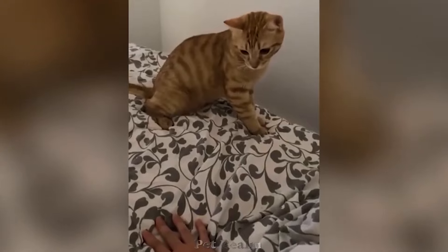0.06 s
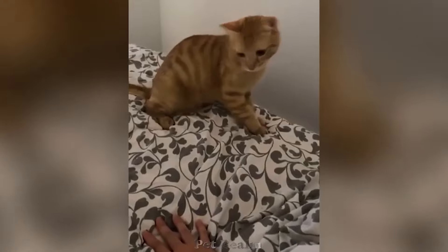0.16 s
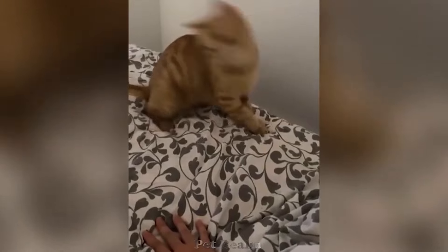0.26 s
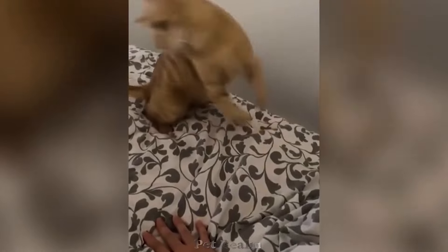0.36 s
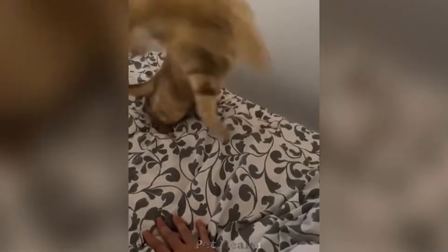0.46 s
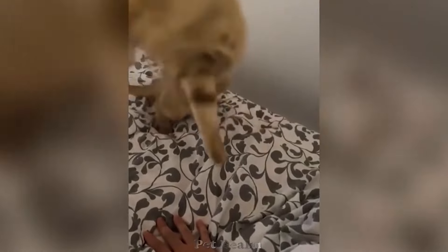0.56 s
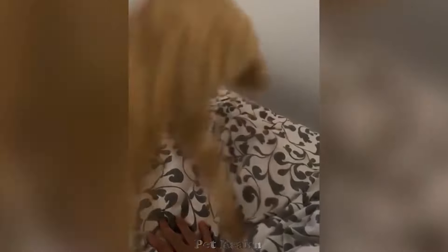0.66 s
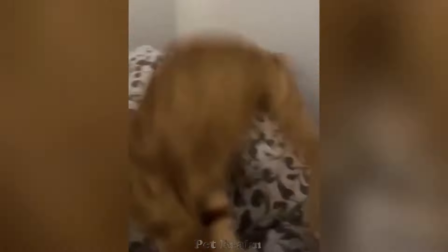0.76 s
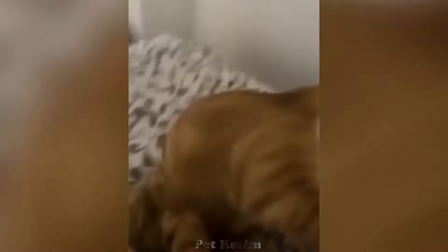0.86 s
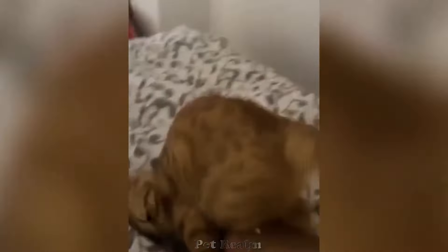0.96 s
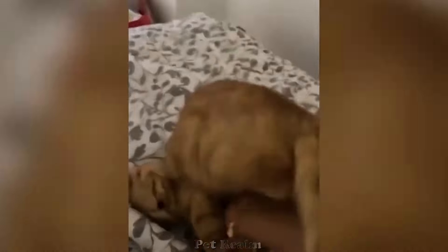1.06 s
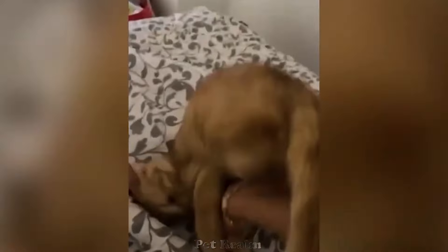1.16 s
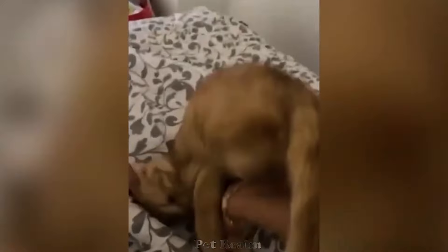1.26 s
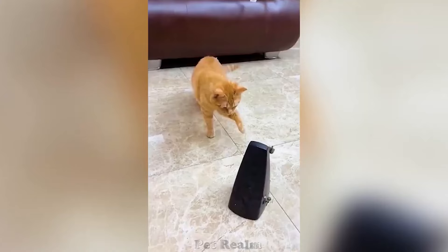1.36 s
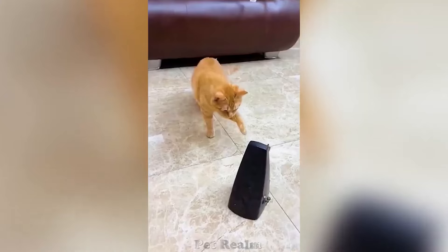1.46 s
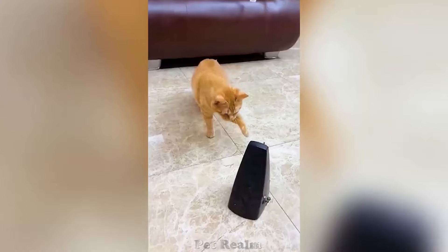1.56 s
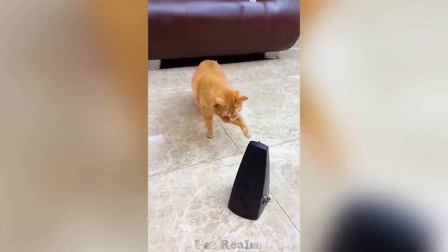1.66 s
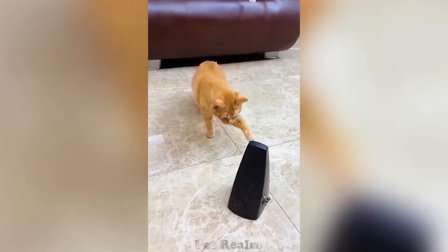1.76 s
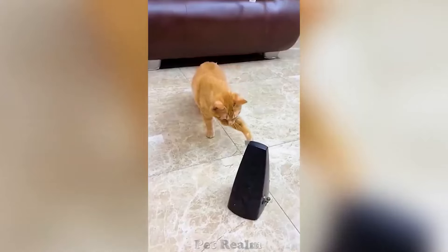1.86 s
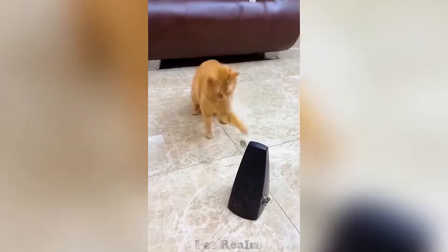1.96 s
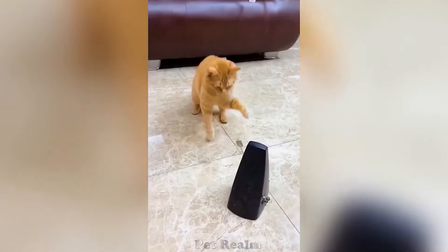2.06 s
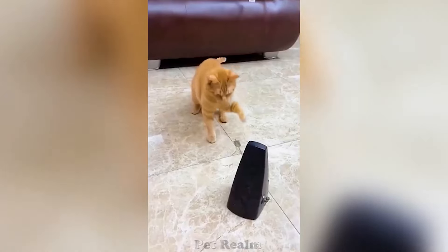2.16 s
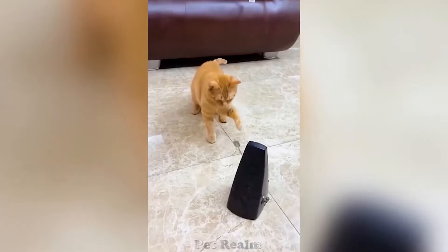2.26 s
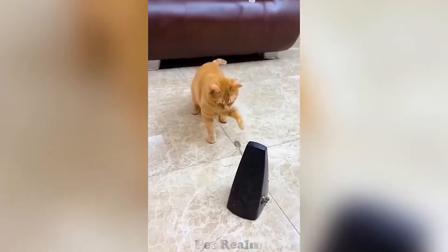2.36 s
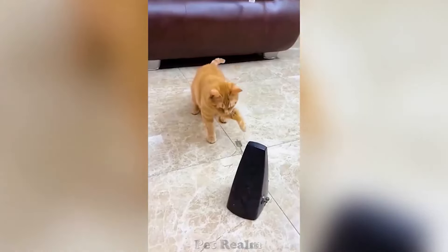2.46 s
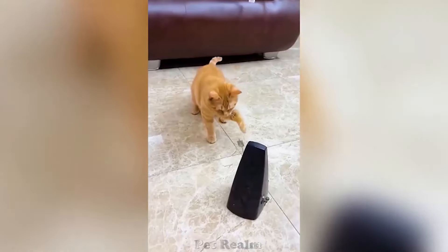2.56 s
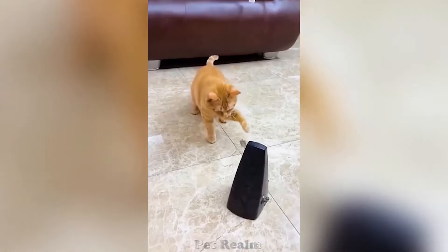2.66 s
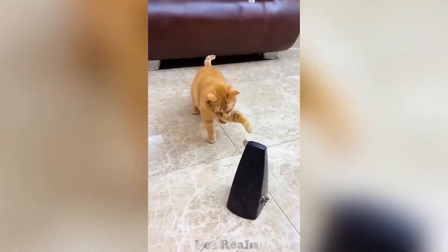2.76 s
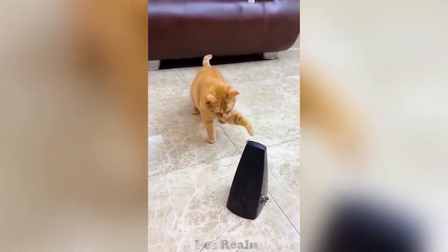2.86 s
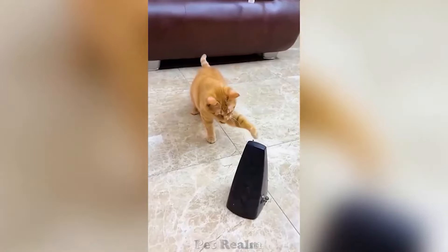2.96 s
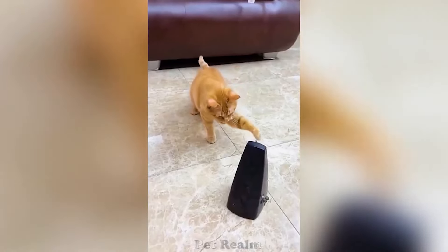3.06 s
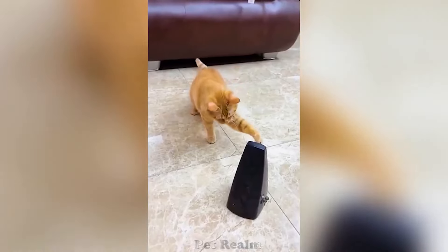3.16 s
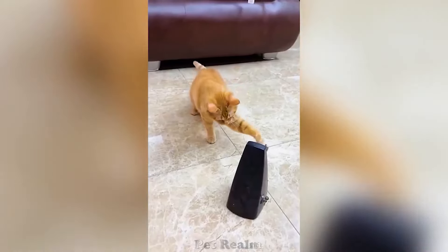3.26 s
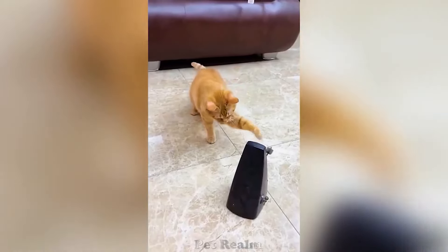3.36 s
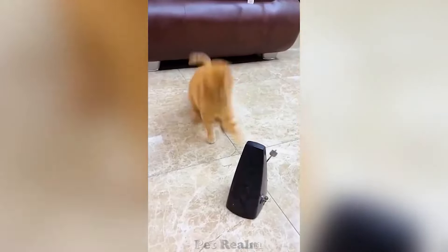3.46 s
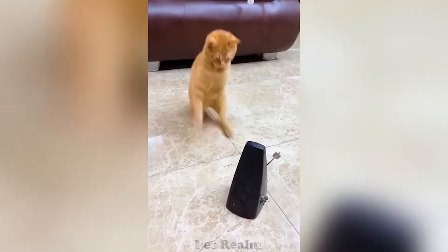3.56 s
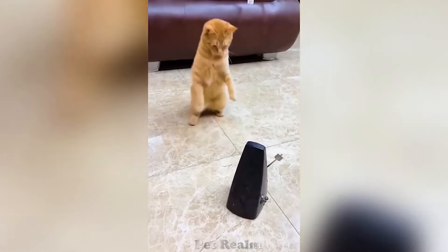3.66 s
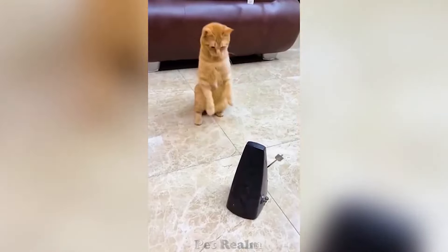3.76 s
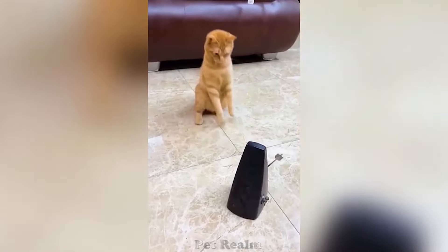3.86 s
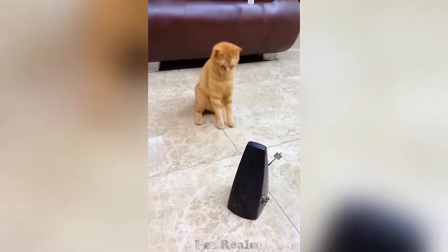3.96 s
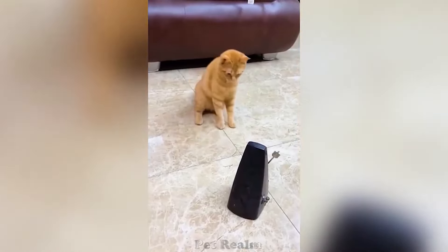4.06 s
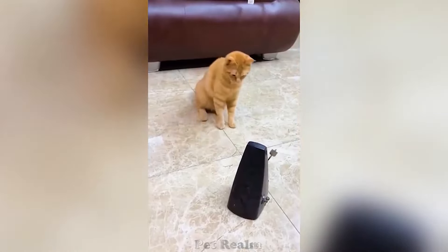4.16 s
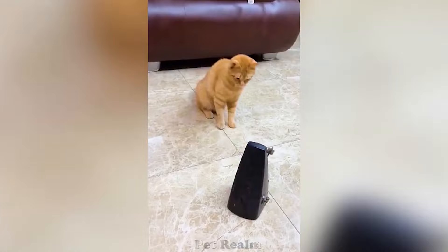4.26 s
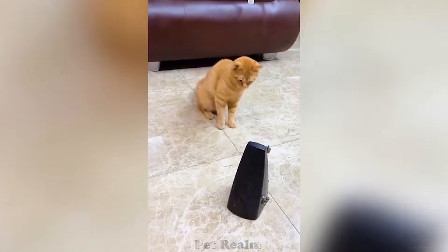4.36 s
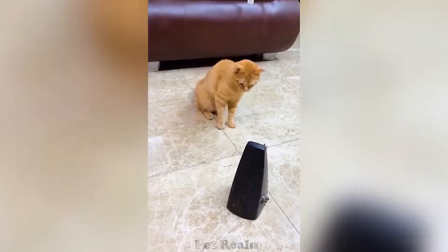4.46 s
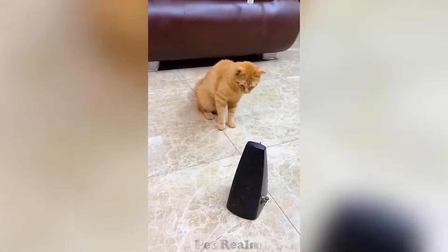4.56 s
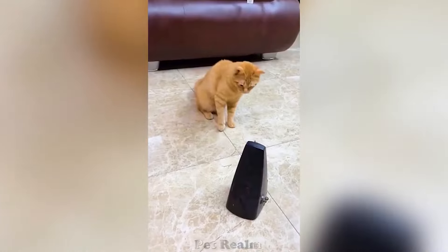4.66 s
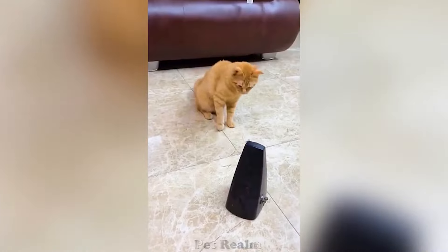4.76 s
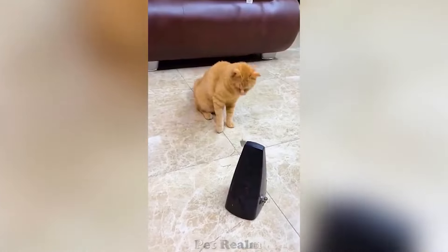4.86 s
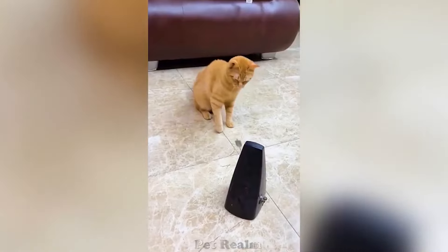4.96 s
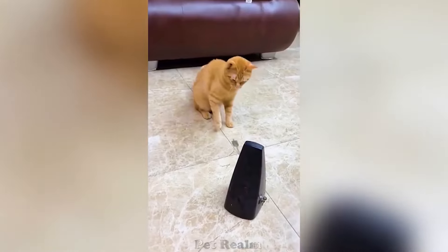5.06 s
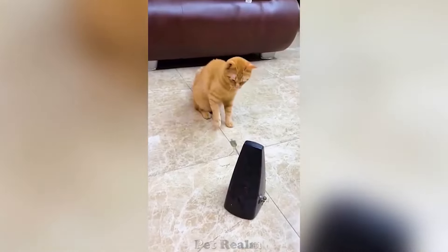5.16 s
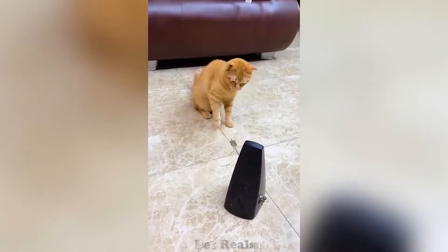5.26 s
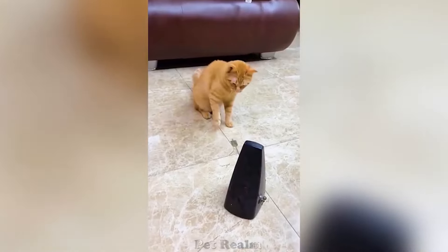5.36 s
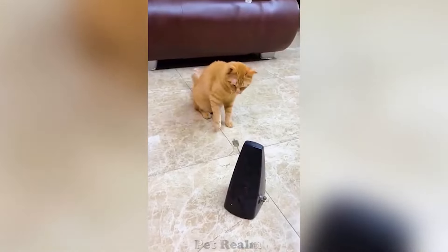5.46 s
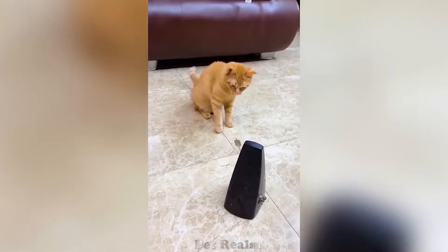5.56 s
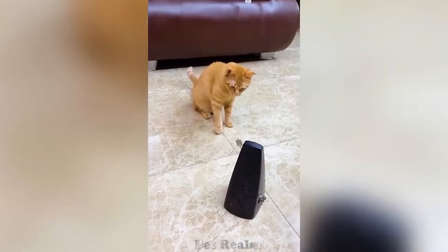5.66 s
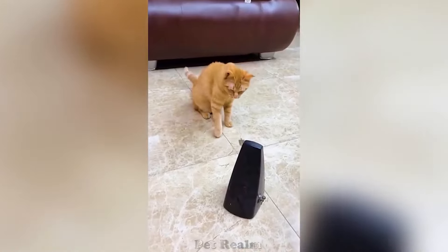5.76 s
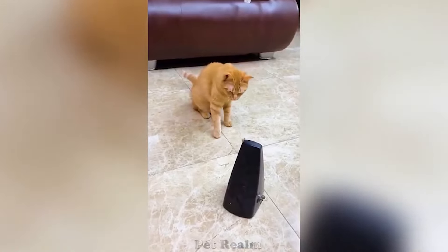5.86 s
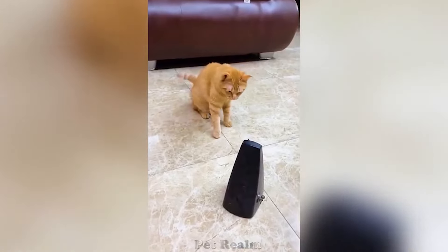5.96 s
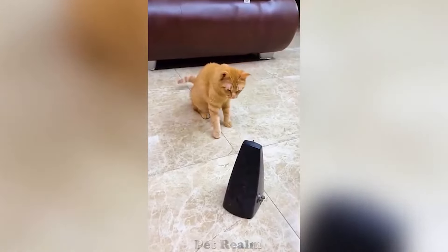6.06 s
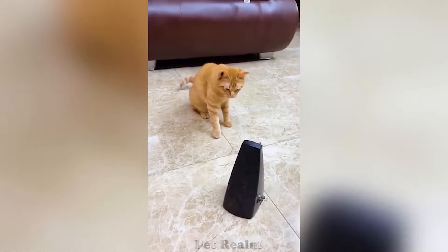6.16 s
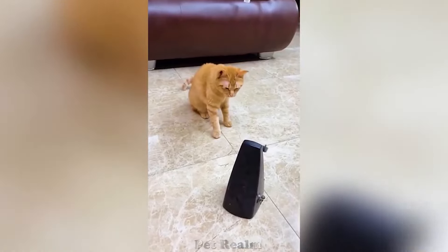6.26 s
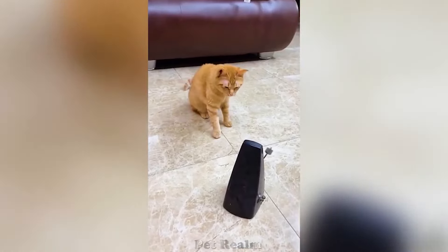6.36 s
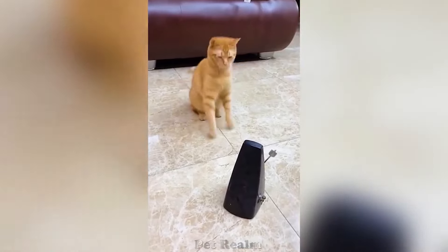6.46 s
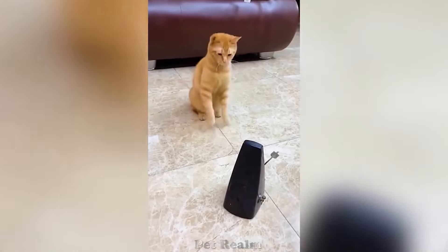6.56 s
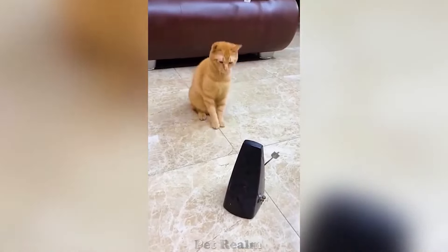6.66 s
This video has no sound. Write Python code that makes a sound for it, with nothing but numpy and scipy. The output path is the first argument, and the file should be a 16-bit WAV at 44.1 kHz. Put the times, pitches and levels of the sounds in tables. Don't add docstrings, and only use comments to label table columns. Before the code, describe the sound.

Close to a phone microphone in a humming bedroom, a kitten leaps over a quilt: low muffled thumps, rustling cloth, faint fur swish and a tiny collar-tag tinkle. It cuts to a short silence, then a quiet tiled room where a pendulum metronome knocks sharply about every one and a half seconds. Every second knock adds a thin, high bell that lingers. A paw lightly brushes the metal rod between ticks.

```python
import sys
import numpy as np
from scipy import signal
from scipy.fft import rfft, irfft, next_fast_len
from scipy.io import wavfile
from scipy.ndimage import uniform_filter1d, map_coordinates

SR = 44100
rng = np.random.default_rng(int(sys.argv[2]) if len(sys.argv) > 2 else 0)


def inscribe(sig):
    pcm = np.round(np.clip(np.atleast_2d(sig).T, -1, 1) * 32767)
    wavfile.write(sys.argv[1], SR, pcm.astype(np.int16))


def undo_db(level):
    steps = np.asarray(level, float) / 20
    return 10 ** steps


N = 296071
TIME = np.arange(N) / SR


def unit(x):
    return x / np.sqrt(np.mean(x ** 2) + 1e-20)


def along(points, hz):
    f, v = np.transpose(points)
    return np.interp(np.log(hz + 1), np.log(f + 1), v)


def wobble(rate):
    return map_coordinates(rng.standard_normal(int(N * rate / SR) + 4), [TIME * rate])


def filtered(x, response):
    m = next_fast_len(len(x) + SR // 2)
    return irfft(rfft(x, m) * response(np.fft.rfftfreq(m, 1 / SR)), m)[:len(x)]


def hiss(spectrum):
    return unit(filtered(rng.standard_normal(N), lambda hz: undo_db(along(spectrum, hz))))


def tone(hz, phase=0):
    return np.sqrt(2) * np.sin(2 * np.pi * hz * TIME + phase)


def since(s):
    return np.maximum(TIME - s, 0)


def body(peaks):
    def response(f):
        total = 0
        for k, (centre, width, db) in enumerate(peaks):
            mode = 1j * f * width / (centre * centre - f * f + 1j * f * width)
            total = total + (-1) ** k * undo_db(db) * mode
        return total
    return response


# (frequency [Hz], level [dB])
BEDROOM_COLOUR = [(20, -36.5), (45, 7), (124, 5), (169, 1.5), (302, -1.5), (421, -11), (571, -11.5),
                  (1000, -14), (1750, -20), (2400, -22.5), (6300, -30), (6700, -35.5), (11800, -45.5),
                  (12600, -58)]
# (frequency [Hz], level [dB])
FAN_LINES = [(301.5, -60), (565.2, -57), (1680, -62.5), (1728, -65.5), (1776, -62), (1927, -65.5)]


def bedroom_fan():
    out = undo_db(-42.5 + .6 * wobble(20)) * hiss(BEDROOM_COLOUR)
    for hz, db in FAN_LINES:
        out += undo_db(db) * np.sin(2 * np.pi * hz * TIME + 1.7 * wobble(17))
    return out


# (frequency [Hz], level [dB])
HALL_COLOUR = [(20, -34.5), (40, 2), (80, 0.5), (130, -1.5), (223, -8.5), (476, -14.5), (776, -13.5),
               (1260, -17.5), (2500, -26), (4600, -33.5), (6000, -40), (8500, -37.5), (11000, -45),
               (13200, -63.5)]
# (time [s], level [dB])
HALL_LOUDNESS = [(1.55, -62), (1.59, -63), (2.04, -62), (2.24, -63), (2.69, -62.5), (3.17, -65.5),
                 (3.48, -62), (4.21, -63.5), (4.93, -62.5), (5.42, -65), (6.71, -62)]
# (time [s], length [s], frequency [Hz], level [dB])
FAR_SQUEAKS = [
    (4.28, .3, 1000, -78),
    (4.55, .15, 2100, -82),
    (5.49, .18, 1707, -72),
    (5.72, .24, 1384, -67),
    (5.98, .1, 1384, -76),
]


def tiled_room_air():
    air_db = np.interp(TIME, *np.transpose(HALL_LOUDNESS))
    out = undo_db(air_db + 2.0 + 2.2 * wobble(6)) * hiss(HALL_COLOUR)
    whine_hz, whine_db = 10546, -96
    out += undo_db(whine_db - 1.5 + 1.7 * wobble(9.2)) * tone(whine_hz)
    for s, length, hz, db in FAR_SQUEAKS:
        waver, broken_db = .5 * wobble(30), 3.5 * wobble(45)
        u = np.clip((TIME - s) / length, 0, 1)
        swell = np.minimum(12 * u, 1.8 * (1 - u)).clip(0, 1)
        out += swell * undo_db(db + broken_db) * tone(hz, waver)
    return out


# (frequency [Hz], level [dB])
TAG_TONES = [(834.4, -55.5), (1825, -55), (3440, -58.5), (4457, -61.5), (5787, -66)]
# (time [s], level [dB])
TAG_JERKS = [
    (.775, 0),
    (.86, 0),
    (.955, 3),
]


def collar_tag():
    t60 = .35
    out = np.zeros(N)
    for s, jerk_db in TAG_JERKS:
        t = since(s)
        for hz, db in TAG_TONES:
            out += np.sqrt(2) * undo_db(jerk_db + db - 60 * t / t60) * np.sin(2 * np.pi * hz * t)
    return out


# (time [s], end [s], quilt push [dB], cloth rustle [dB], fur swish [dB])
KITTEN_LUNGES = [
    (0.705, 0.783, -31, -42.5, -55.5),
    (0.816, 0.943, -29, -44.5, -51.5),
    (0.993, 1.112, -37, -50, -57),
]
# (time [s], peak level [dB], frequency [Hz])
PAW_THUDS = [
    (0.708, -25, 94.2),
    (0.754, -20.5, 282),
    (0.789, -29, 191),
    (0.845, -23.5, 207),
    (0.863, -23, 54),
    (0.889, -26, 129),
    (0.919, -28.5, 76.7),
    (1.026, -25, 207),
    (1.073, -35, 51.1),
    (1.13, -34.5, 64),
]


def lunge_levels():
    rise, fall = 2500, 450
    push = cloth = fur = 0
    for s, end, *dbs in KITTEN_LUNGES:
        slope_db = rise * (s - TIME).clip(0) + fall * since(end)
        one_push, one_cloth, one_fur = undo_db(np.c_[dbs] - slope_db)
        push, cloth, fur = push + one_push, cloth + one_cloth, fur + one_fur
    scuff_db, scuff_t60 = -17, .1
    for s, db, _ in PAW_THUDS:
        cloth = cloth + undo_db(db + scuff_db - 60 * since(s) / scuff_t60) * (TIME > s)
    return 20 * np.log10(np.array([push, cloth, fur]) + 1e-9)


# (frequency [Hz], level [dB])
PUSH_COLOUR = [(12, -42), (20, -14.5), (49, 3.5), (128, 3), (156, -2), (291, -1), (475, -44), (700, -51),
               (910, -77.5), (1540, -120)]
# (frequency [Hz], level [dB])
CLOTH_COLOUR = [(240, -24), (400, -3), (657, -17), (1120, -10), (1430, -16), (1880, -14.5), (2820, -20),
                (4500, -23.5), (5850, -45), (9900, -120)]
# (frequency [Hz], level [dB])
FUR_COLOUR = [(2650, -26), (4500, 0), (6000, -2.5), (6800, -10), (11500, -19), (15000, -26.5)]


def pounce():
    push_db, cloth_db, fur_db = lunge_levels()
    fibres = undo_db(wobble(60) + 1.4 * wobble(400))
    out = undo_db(push_db - 5.0) * unit(undo_db(1.5 * wobble(40)) * hiss(PUSH_COLOUR))
    out += undo_db(cloth_db) * unit(fibres * hiss(CLOTH_COLOUR))
    out += undo_db(fur_db + 1.5) * unit(fibres * hiss(FUR_COLOUR))
    for s, db, hz in PAW_THUDS:
        t = since(s)
        out += undo_db(db + 5.5 - 60 * t * hz / 7) * np.sin(2 * np.pi * hz * t)
    return out


# (time [s], rod level [dB], rise [s], t60 [s], scuff level over the rod [dB])
PAW_TOUCHES = [
    (2.397, -51.5, 0.027, 0.54, -6),
    (3.183, -72, 0.0023, 0.061, 15),
    (6.02, -66.5, 0.017, 0.091, 13.5),
]
# (frequency [Hz], width [Hz], level [dB])
ROD_MODES = [(1446, 30, -5), (1930, 60, -9), (2060, 17, -5), (2390, 49, -4), (2850, 46, -11.5),
             (3383, 18, 3), (5960, 500, -30), (8800, 1300, -29)]


def paw_on_rod():
    rod = unit(filtered(rng.standard_normal(N), lambda f: body(ROD_MODES)(f) / (1 + (f / 11500) ** 12)))
    scuff = hiss([(150, 9), (600, 8.5), (6000, -3), (12500, -15), (13500, -46)])
    out = np.zeros(N)
    for s, db, rise, t60, scuff_db in PAW_TOUCHES:
        t = since(s)
        out += undo_db(db - 60 * t / t60) * (1 - np.exp(-t / rise)) * (rod + undo_db(scuff_db) * scuff)
    return out * undo_db(0.72 * wobble(79))


# (offset [Hz], t60 [s], starting sign, level on first strike [dB], level on second strike [dB])
SECOND_MODES = [(0, 28.7, 1, -58.8, -57.2), (1.133, 5.25, -1, -46, -50), (1.715, 3.84, 1, -54.2, -55.7)]
THIRD_MODES = [(0, 2.15, 1, -27.7, -29.2), (-.442, .39, -1, -14.9, -11.6), (-.442, 7, -1, -63, -63)]
FOURTH_MODES = [(0, .7, 1, -26.6, -28.1), (-2.675, .56, -1, -36, -56), (-11.445, .87, 1, -64.2, -44.1)]


def bell_levels():
    earlier_s = .4
    earlier_db = (1.2, -2.2, -2.4)
    build_s = (.004, .077, .044)
    strikes = np.array([earlier_s] + [s for s, *_ in BELL_TICKS])
    last = np.maximum(np.searchsorted(strikes, TIME) - 1, 0)
    t = abs(TIME - strikes[last])
    levels = []
    for modes, build in zip((SECOND_MODES, THIRD_MODES, FOURTH_MODES), build_s):
        ring = 0
        for (hz, t60, sign, first_db, next_db), more_db in zip(modes, earlier_db):
            strike_db = np.array([first_db + more_db, first_db, next_db])[last]
            ring = ring + sign * undo_db(strike_db - 60 * t / t60) * np.exp(2j * np.pi * hz * t)
        levels.append(20 * np.log10(abs(ring) * (1 - np.exp(-(t / build) ** 2)) + 1e-9))
    step_db, rung_db = 3, -35.3
    rungs = rung_db + step_db * np.round((np.array(levels[1:]) - rung_db) / step_db)
    upper = uniform_filter1d(np.where(last > 0, rungs, -140), size=300)
    return levels[0], *upper


BELL_PARTIALS = (5033.4, 9130.1, 13953.5)


def bell():
    out = np.zeros(N)
    for hz, db in zip(BELL_PARTIALS, bell_levels()):
        out += undo_db(db) * tone(hz)
    low_hz = (1971, 1988)
    for events, db, t60 in ((BELL_TICKS, -54, 1.3), (PLAIN_TICKS, -56, .7)):
        for s, *_ in events:
            t = since(s + .006)
            pair = np.subtract(*np.sin(2 * np.pi * np.outer(low_hz, t)))
            out += undo_db(db - 60 * t / t60) * pair
    return out


# (from [s], to [s], level under the partial [dB])
THIRD_NOISE = [(.022, 0.084, -5), (0.078, .92, -37.5)]
# (time [s], end [s], level under the partial [dB])
FOURTH_NOISE = [(3.4, 3.496, -5), (3.5, 3.545, -26), (3.654, 3.767, -14), (6.364, 6.45, -4),
                (6.447, 6.52, -21), (6.512, 6.612, -3), (6.613, 6.698, -33)]
# (frequency [Hz], width [Hz])
NOISE_BANDS = [(8900, 840), (13700, 1500)]


def bell_grit():
    third = [(s + a, s + b, db) for s, *_ in BELL_TICKS for a, b, db in THIRD_NOISE]
    out = np.zeros(N)
    for spans, (hz, width), level_db in zip((third, FOURTH_NOISE), NOISE_BANDS, bell_levels()[1:]):
        band = unit(filtered(rng.standard_normal(N), lambda f: 1. * (abs(f - hz) < width / 2)))
        for s, end, db in spans:
            edge = np.clip(np.minimum(TIME - s, end - TIME) / .012, 0, 1)
            out += undo_db(db + level_db) * band * edge
    return out


# (frequency [Hz], t60 [s])
ROOM_T60 = [(250, 0.34), (1000, 0.6), (4000, 0.62), (8000, 0.55), (11000, 0.4), (14500, 0.45)]


def room(x):
    hz, t, z = signal.stft(rng.standard_normal(len(x)), SR, nperseg=256)
    fading = z * undo_db(-60 * t / along(ROOM_T60, hz)[:, None])
    tail = signal.istft(fading, SR, nperseg=256)[1][:len(x)]
    tail *= 1 - np.exp(-(TIME[:len(x)] / 0.0037) ** 2)
    return signal.fftconvolve(x, tail / np.linalg.norm(tail))[:len(x)]


def knock(db, hz, t60, rise):
    t = TIME[:SR]
    return undo_db(db - 60 * t / t60) * (1 - np.exp(-t / rise)) * np.sin(2 * np.pi * hz * t)


# (delay [s], level [dB])
NEAR_ECHOES = [(0.0115, -9.5), (0.0174, -11.5)]
# (frequency [Hz], t60 [s], rise [s])
HOLLOW_AIR = (330, 0.15, .016)
FRONT_PANEL = (560, .073, 0.004)
MAINSPRING = (1316, 0.52, 0.0086)


def escapement(events, chatter, case, air, ring_db, crack_db, wet_db, wash_db):
    out, t = np.zeros(N + SR), TIME[:SR]
    blow = 1. * (t == 0)
    ring = filtered(blow, lambda f: body(case)(f) * (1j * f / (500 + 1j * f)) ** 2)
    ring *= (1 - np.exp(-t / 0.0014)) ** 2 * undo_db(ring_db) / abs(ring).max()
    back = sum(undo_db(db) * np.roll(ring, round(lag * SR)) for lag, db in NEAR_ECHOES)
    wash = filtered(np.roll(blow, 200), lambda f: undo_db(along(air, f)))
    wash *= undo_db(wash_db) / np.linalg.norm(wash)
    for s, db, room_db, hollow_db, panel_db in events:
        burst = np.zeros(SR)
        for lag, hit_db in chatter:
            burst += undo_db(hit_db + rng.normal(0, 1) - 60 * (t - lag) / 0.018) * (t >= lag)
        crack = filtered(burst * rng.standard_normal(SR), lambda f: undo_db(along(air, f)))
        crack *= undo_db(crack_db) / abs(crack).max()
        tones = ring + knock(hollow_db, *HOLLOW_AIR) + knock(panel_db, *FRONT_PANEL)
        tones += knock(-33, *MAINSPRING)
        answer = undo_db(room_db) * room(undo_db(wet_db) * tones + wash)
        out[round(s * SR):][:SR] += undo_db(db) * (tones + back + crack + answer)
    return out[:N]


# (time [s], peak level [dB], room [dB], hollow air [dB], panel [dB])
PLAIN_TICKS = [
    (1.866, -12.5, 0, -27.5, -13),
    (4.833, -11.5, -0.5, -29.5, -13),
]
# (time [s], level [dB])
PLAIN_CHATTER = [(0, -20.5), (.0012, -2), (.0022, 0), (.0038, -4.5), (.0075, -8.5), (0.011, -2),
                 (.019, -2.5)]
# (frequency [Hz], width [Hz], level [dB])
PLAIN_CASE = [(911, 33, -4), (1080, 21, 1), (1335, 31, -8.5), (1497, 63, 1.5), (1940, 27, -5),
              (2478, 26, -6.5), (2728, 85, 1.5), (3503, 126, 3.5), (4040, 58, 0), (4670, 220, 1.5),
              (6020, 76, -10), (7330, 71, -15), (8100, 230, -15), (9600, 350, -17)]
# (frequency [Hz], level [dB])
PLAIN_CRACK = [(150, -96), (300, -17), (600, -7.5), (1400, -2.5), (3000, -10.5), (5000, -12), (6500, -17),
               (8000, -11.5), (12000, -20.5), (14500, -23.5), (16000, -39.5)]


def plain_ticks():
    return escapement(PLAIN_TICKS, PLAIN_CHATTER, PLAIN_CASE, PLAIN_CRACK,
                      ring_db=6.5, crack_db=-2.0, wet_db=-4.0, wash_db=9.5)


# (time [s], peak level [dB], room [dB], hollow air [dB], panel [dB])
BELL_TICKS = [
    (3.372, -13, -0.5, -15.5, -16),
    (6.349, -13.5, -0.5, -15.5, -19),
]
# (time [s], level [dB])
BELL_CHATTER = [(0, -16.5), (.0012, -5), (.0028, -10.5), (.0052, -12.5), (.0075, -3.5), (0.0103, -7),
                (0.021, -10)]
# (frequency [Hz], width [Hz], level [dB])
BELL_CASE = [(902, 46, -10), (1037, 49, -9.5), (1334, 160, -7), (1531, 130, 0), (2029, 70, -6),
             (2452, 110, -3.5), (2732, 73, -5), (3524, 88, -3), (4034, 140, -3.5), (4934, 84, -7),
             (7390, 210, -14), (8320, 470, -8)]
# (frequency [Hz], level [dB])
BELL_CRACK = [(150, -83), (300, -18.5), (600, -7), (1500, -5.5), (3000, -11), (5000, -17), (6500, -18.5),
              (9000, -12), (11000, -25.5), (14000, -19.5), (16000, -39)]


def bell_ticks():
    return escapement(BELL_TICKS, BELL_CHATTER, BELL_CASE, BELL_CRACK,
                      ring_db=4.5, crack_db=-4.0, wet_db=-2.0, wash_db=7.5)


def masked(x, under_db, up_db, down_db, quiet_db, from_hz):
    hz, s, z = signal.stft(x, SR, nperseg=1024)
    power, khz = abs(z) ** 2, (hz[:, None] - hz) / 1000
    spread = undo_db(2 * (under_db - np.where(khz > 0, up_db * khz, -down_db * khz)))
    thrift_db = 32 * (hz[:, None] > 14600) + 14 * (s < 1.67)
    cover = spread @ power + undo_db(2 * (quiet_db + thrift_db))
    smooth = uniform_filter1d(uniform_filter1d(power, size=9, axis=0), size=3, axis=1)
    share = np.clip(np.maximum(power / 30, smooth) / cover, 0, 1) ** 4
    return signal.istft(z * np.where(hz[:, None] > from_hz, share, 1), SR, nperseg=1024)[1][:N]


def scene():
    cut_out, cut_in, low_cut_hz = 1.134, 1.4065, 24.3
    metronome = plain_ticks() + bell_ticks() + bell()
    tiled = masked(metronome + paw_on_rod() + tiled_room_air(),
                   under_db=-36.5, up_db=4.5, down_db=11.5, quiet_db=-125, from_hz=4300)
    tiled += bell_grit()
    kitten = filtered(bedroom_fan() + pounce() + collar_tag(),
                      lambda f: (1j * f / (low_cut_hz + 1j * f)) ** 2)
    smear = undo_db(-15.0 - 570 * (TIME - cut_out)) * (TIME < cut_out + .043)
    fade = np.where(TIME < cut_out, 1, smear)
    return (fade * kitten + (TIME >= cut_in) * tiled)[None]


def low_pass(x):
    return signal.sosfilt(signal.butter(12, 15850, fs=SR, output="sos"), x)


def record(dry):
    top = .28
    rounded = dry / (1 + abs(dry / top) ** 4) ** (1 / 4)
    return low_pass(rounded)


dry = scene()
out = record(dry)
inscribe(out)
```